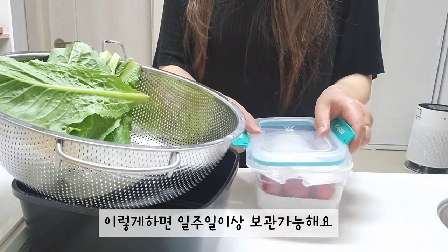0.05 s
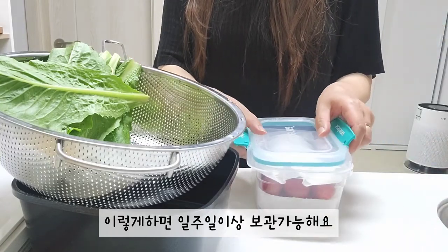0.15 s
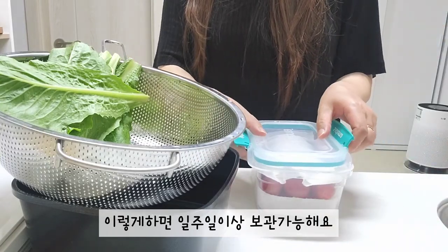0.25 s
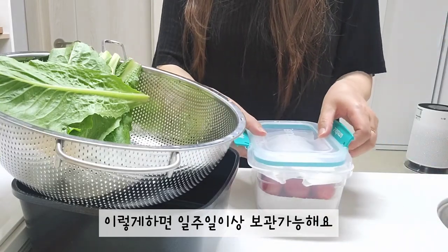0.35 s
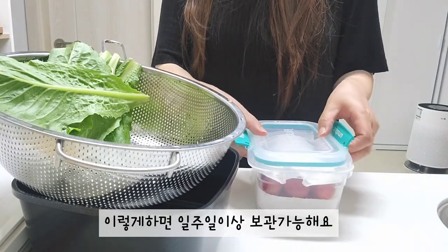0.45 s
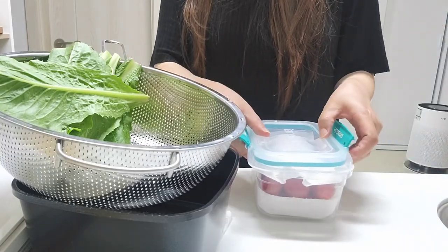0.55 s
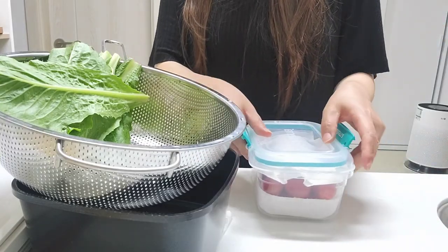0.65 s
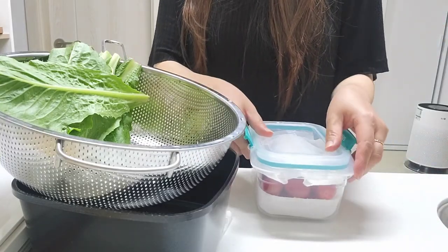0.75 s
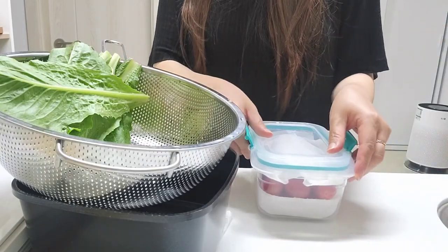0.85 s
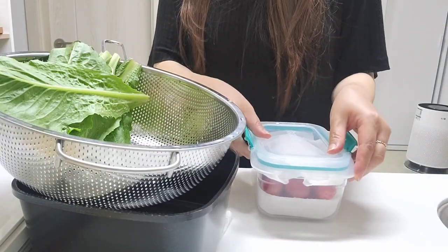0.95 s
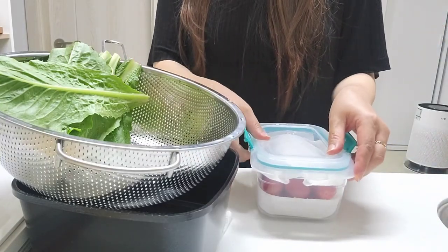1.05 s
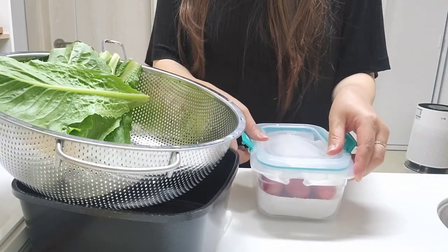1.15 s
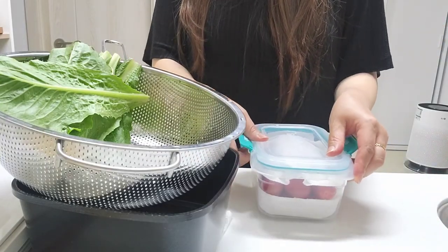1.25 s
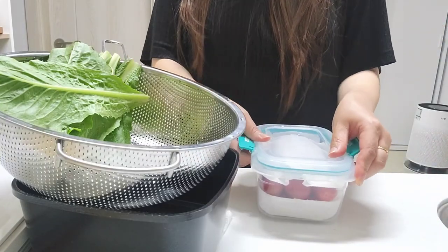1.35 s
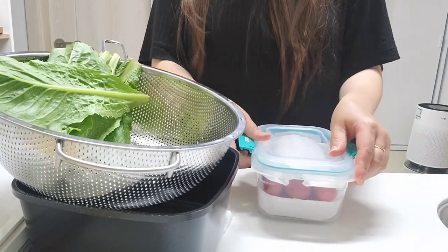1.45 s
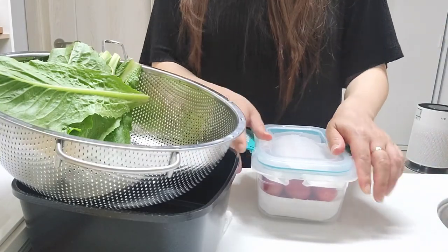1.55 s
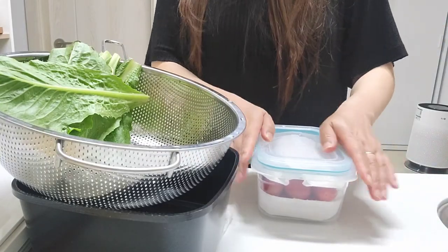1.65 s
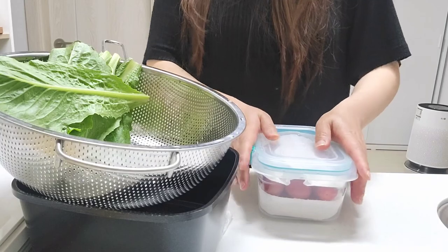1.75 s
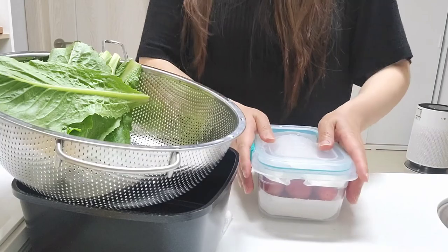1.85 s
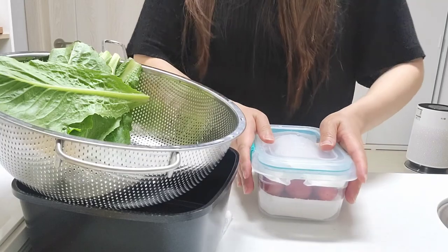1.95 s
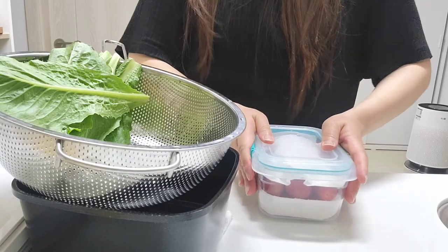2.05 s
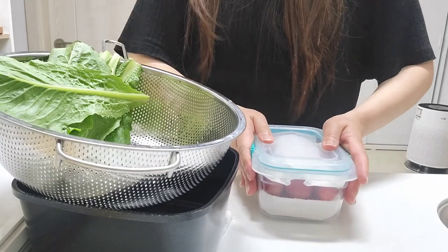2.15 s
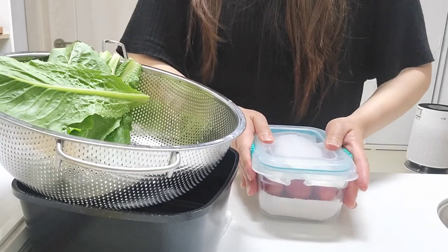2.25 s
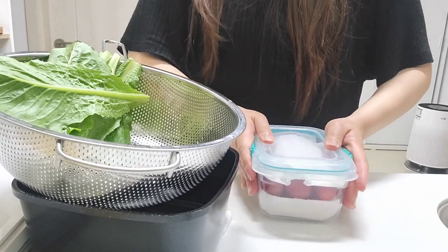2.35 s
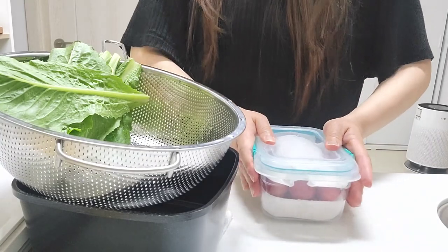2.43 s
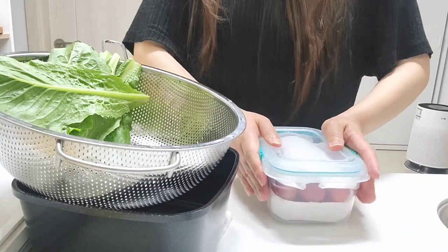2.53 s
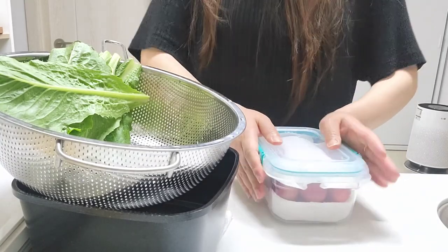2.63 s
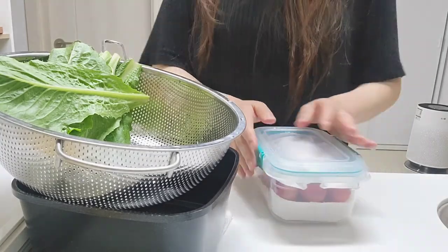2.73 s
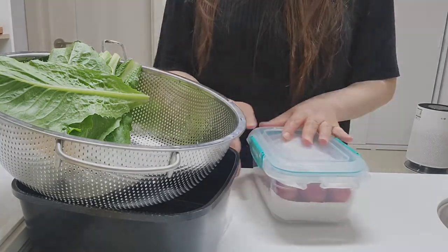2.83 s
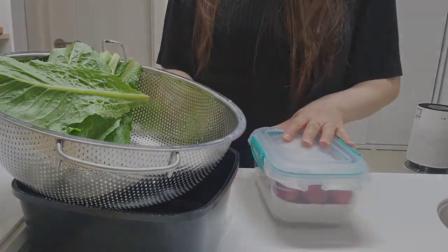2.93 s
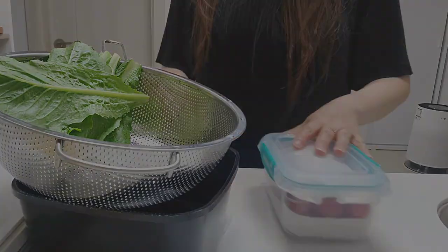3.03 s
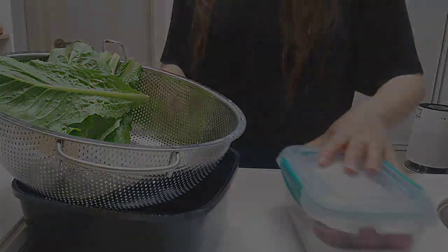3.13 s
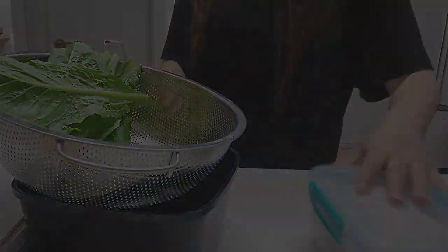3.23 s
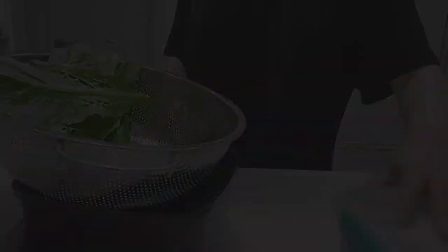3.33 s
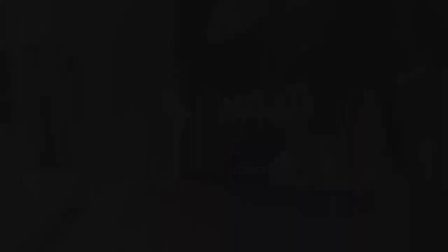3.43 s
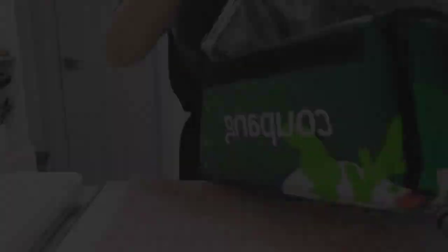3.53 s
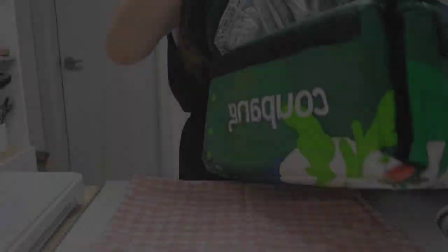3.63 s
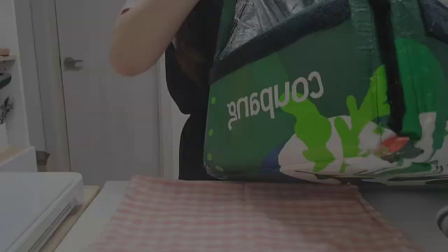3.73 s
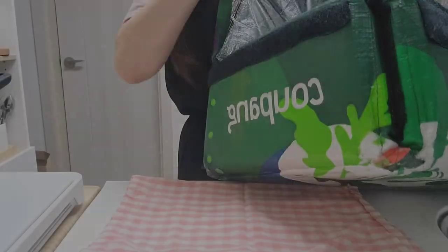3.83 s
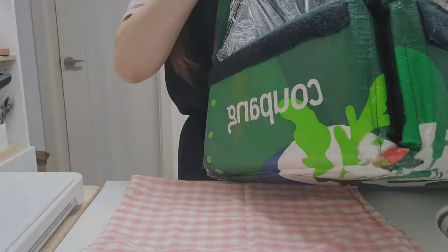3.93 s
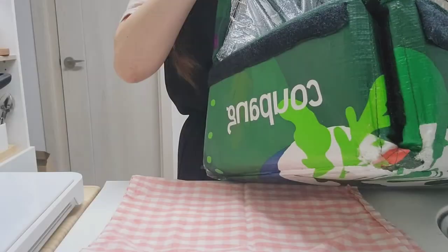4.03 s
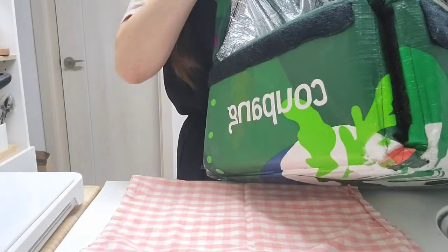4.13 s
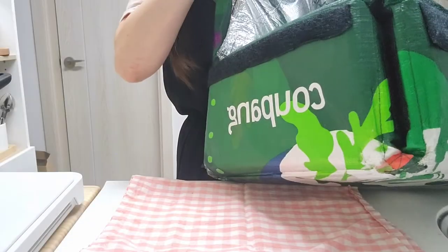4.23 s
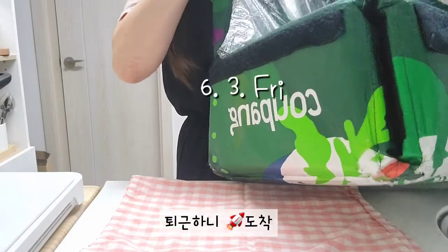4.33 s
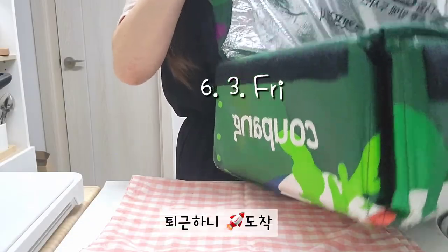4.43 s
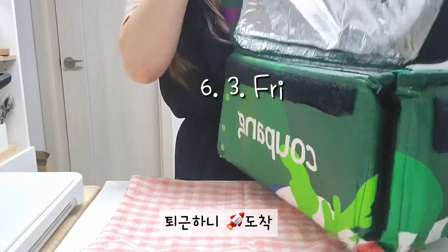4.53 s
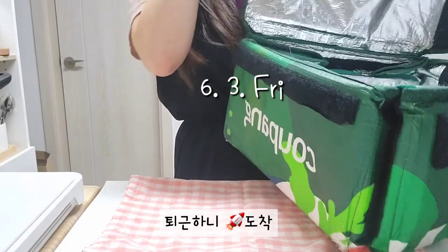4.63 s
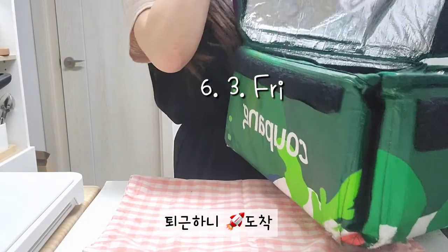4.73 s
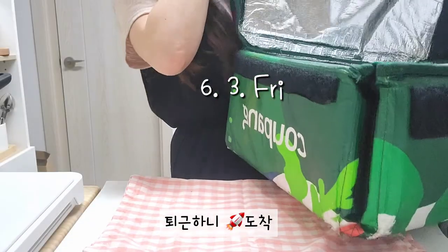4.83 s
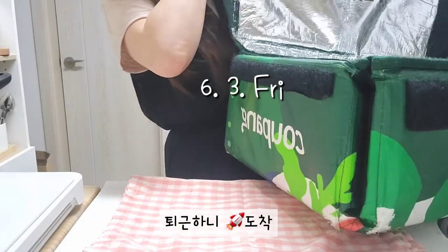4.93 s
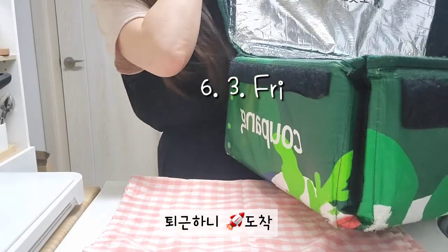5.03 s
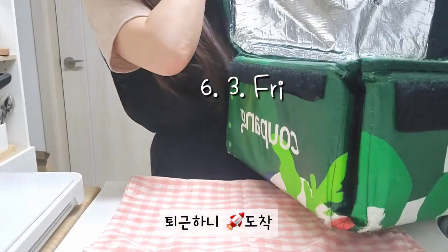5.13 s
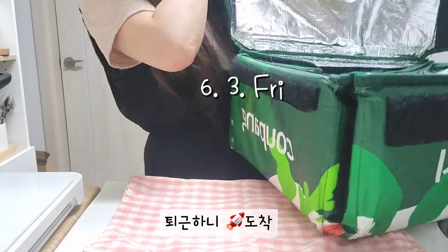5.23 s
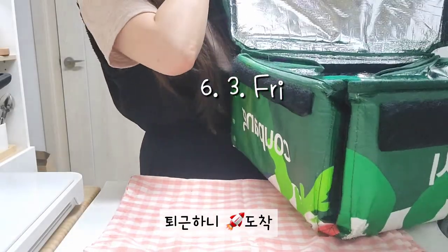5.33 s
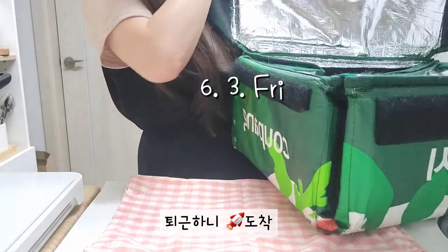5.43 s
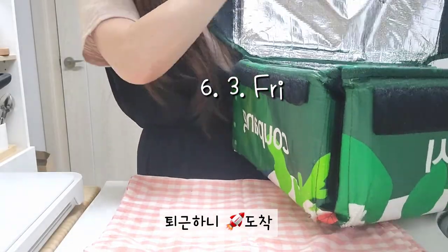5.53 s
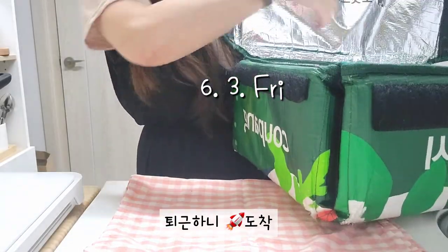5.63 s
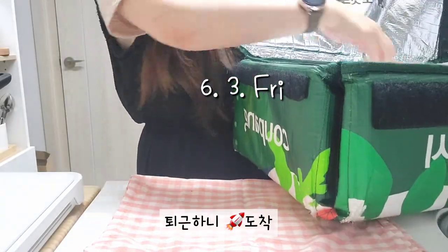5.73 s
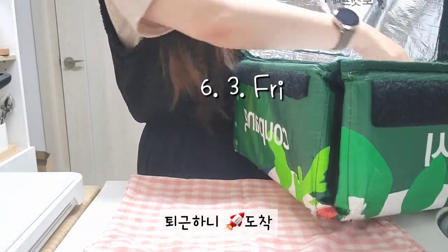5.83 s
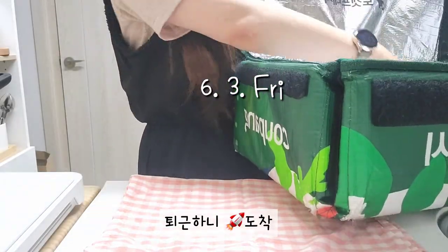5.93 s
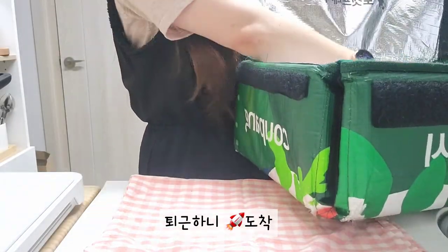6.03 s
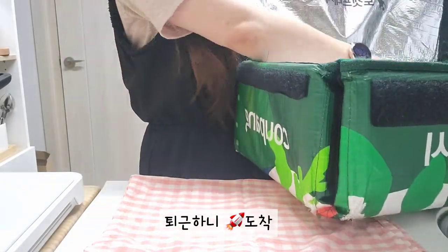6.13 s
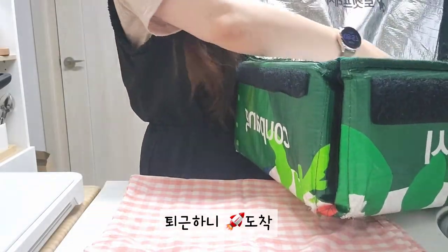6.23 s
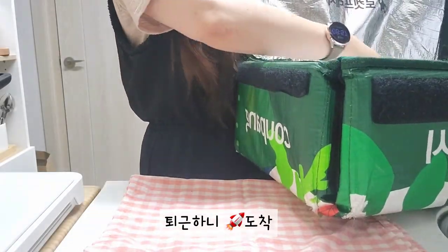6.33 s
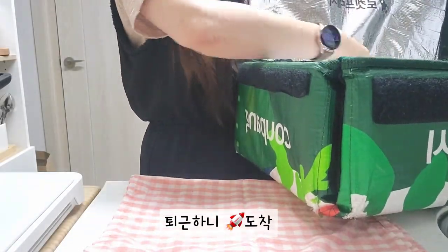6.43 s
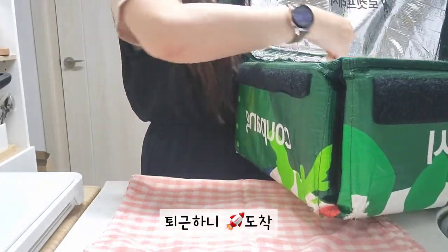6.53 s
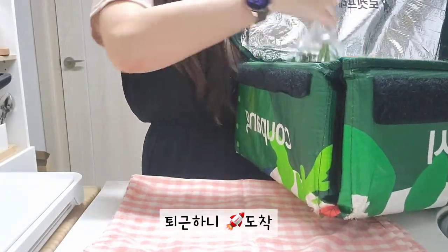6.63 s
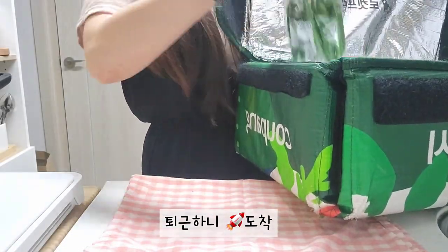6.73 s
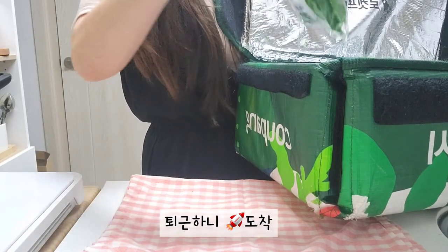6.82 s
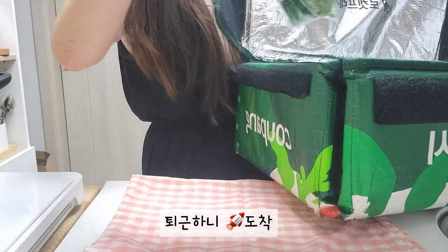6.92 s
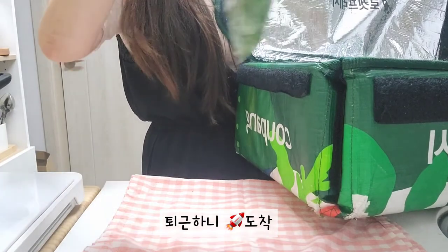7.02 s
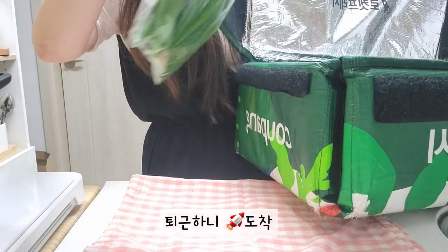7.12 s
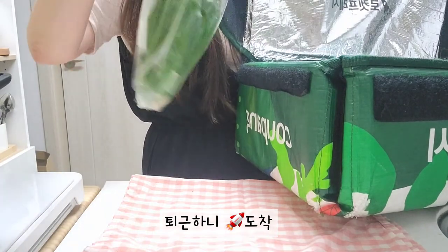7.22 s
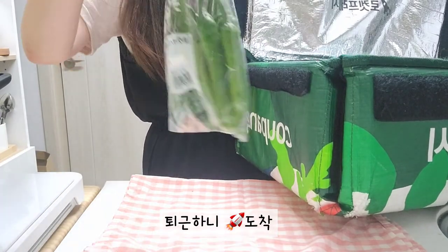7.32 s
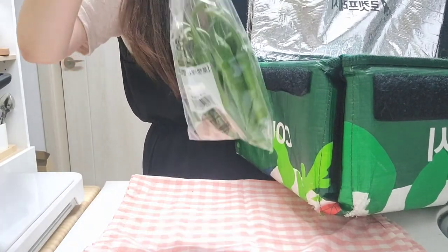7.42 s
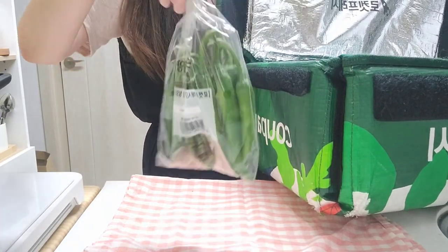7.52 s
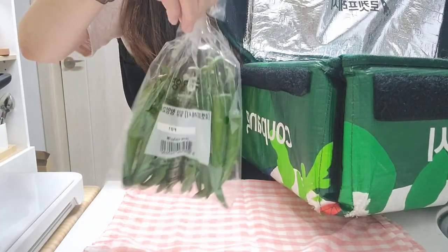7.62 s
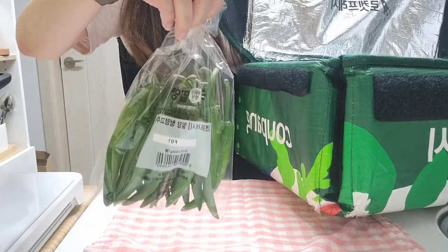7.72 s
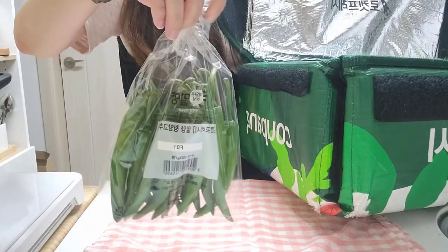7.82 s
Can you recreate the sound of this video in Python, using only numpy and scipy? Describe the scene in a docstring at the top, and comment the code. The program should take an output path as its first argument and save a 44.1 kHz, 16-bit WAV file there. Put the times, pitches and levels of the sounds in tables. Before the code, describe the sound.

Close clicks, light knocks and faint finger squeaks come from a plastic container, followed by loud latch snaps and a short slide over a counter. The quiet room tone then switches to a fan's low rush. A little farther off, a padded cooler bag rustles, pops at its folds and thumps down. A hand rummages inside and pulls out a crackling plastic bag of vegetables. The small kitchen adds a short echo.

```python
"""Fingers rub and squeak on a plastic food box on a kitchen counter; its latches crack shut, ringing
the hollow walls, and it slides away. Later, with a fan running, a foil-lined cooler bag is dragged
round and set down: cloth scrapes, folds pop, padding thumps. Last, a thin plastic bag of vegetables
crinkles as it is lifted out, its creases flipping in clumps. A small, hard room answers."""
import sys
import numpy as np
from scipy import signal
from scipy.io import wavfile
from scipy.ndimage import uniform_filter1d

SR = 44100
rng = np.random.default_rng(int(sys.argv[2]) if len(sys.argv) > 2 else 0)


def put_to_file(sound):
    """Save the sound as 16-bit audio at rate SR, in the file named by the first command-line argument."""
    columns = np.atleast_2d(sound).T  # one column per channel
    safe = np.clip(columns, -1, 1)
    whole_steps = np.round(safe * 32767)
    wavfile.write(sys.argv[1], SR, whole_steps.astype(np.int16))


N = 347067
TIME, FILTER_HZ = np.arange(N) / SR, np.fft.rfftfreq(4096, 1 / SR)
FAN_START_S = 3.538  # hard cut from the quiet room to the fan

# Cue levels are pre-fader: each source adds its own trims.
# EQ of the quiet room tone: f/Hz, level/dB
QUIET_EQ = [(20, -9.5), (60, 1.5), (115, 3), (170, -2.5), (300, -9), (470, -14), (680, -10.5), (950, -27.5),
            (1400, -24), (2500, -35), (6000, -42), (15000, -59)]
# fingers rub the lid, then shove the box away: t/s, length/s, rub level/dB, hiss level/dB
SLIDE_STROKES = [(0.0, 0.19, -77, -89), (0.234, 0.05, -66, -76), (1.34, 0.089, -72.5, -86),
                 (1.692, 0.088, -68, -75), (1.825, 0.39, -74, -89.5), (2.498, 0.16, -70.5, -77),
                 (2.654, 0.19, -81, -86.5), (3.005, 0.075, -69, -68), (3.033, 0.37, -64, -63),
                 (3.236, 0.25, -58, -53.5)]
# resonances that sliding wakes in the box: f/Hz, width/Hz, level/dB
SLIDE_RESONANCES = [(4330, 90, 0), (5400, 95, -1), (8500, 110, -2)]
# EQ of the sliding friction: f/Hz, level/dB
SLIDE_EQ = [(530, -28), (900, -3.5), (1250, 2), (1900, 2), (2500, -3), (3200, 0), (4050, -3.5),
            (5220, -1.5), (9000, -6), (16000, -11)]
# surfaces that stick and slip at a pitch, plus one short, broad crunch of the cooler bag at 4.68 s: t/s,
# length/s, f/Hz, width/Hz, level/dB
SQUEAK_CUES = [(0.0, 0.37, 1360, 1090, -65.5), (0.082, 0.12, 4230, 450, -79), (1.879, 0.33, 3500, 990, -66),
               (1.93, 0.19, 5000, 900, -77), (1.91, 0.25, 6030, 200, -82), (2.52, 0.16, 3870, 318, -73),
               (2.515, 0.07, 5980, 260, -74), (2.681, 0.16, 3590, 401, -76), (3.0, 0.12, 3870, 500, -63),
               (3.03, 0.21, 3170, 400, -70), (3.4, 0.12, 5240, 240, -54.5), (4.678, 0.036, 2565, 2590, -32),
               (6.643, 0.094, 3040, 605, -49.5)]
# latch snaps and knocks: t/s, clack level/dB, thud level/dB, tick level/dB, struck spot's f/Hz
BOX_KNOCKS = [(0.0726, -38, -46.5, -70, 1450), (0.223, -54.5, -64, -77, 5500), (0.281, -33, -39, -51, 624),
              (0.2847, -31, -35.5, -47, 1180), (0.318, -66, -43.5, -78, 205), (0.583, -63.5, -66, -97, 690),
              (0.783, -50, -53.5, -82, 995), (0.836, -44, -49, -75.5, 1130), (0.849, -57, -50, -88, 540),
              (1.133, -55, -51, -79, 190), (1.31, -65, -57, -89, 217), (1.648, -47, -53.5, -74, 182),
              (1.723, -50, -62, -72, 250), (1.779, -45, -56, -64, 1390), (1.842, -54.5, -76, -68, 3950),
              (1.858, -47.5, -58, -74, 1390), (2.159, -21, -25.5, -46, 350), (2.199, -17, -43.5, -31, 1560),
              (2.304, -22, -31.5, -48, 640), (2.3108, -16.5, -32.5, -27, 2190),
              (2.914, -68, -50, -79, 201.6), (3.105, -48.5, -47, -86, 215),
              (3.329, -39.5, -47, -49.5, 1310)]
# EQ of a blow on the box: f/Hz, level/dB
BOX_EQ = [(41, -48.5), (85, 4.5), (160, -2), (305, 7.5), (440, 0), (700, 8.5), (1000, 0), (1150, 0.5),
          (1600, 4), (2120, -9), (2980, -9.5), (3490, -17), (5140, -22), (11600, -37.5), (16000, -42)]
# modes of box and lid: f/Hz, level/dB, t60/s
SHELL_MODES = [(231.3, 0, 0.23), (298.6, -1, 0.11), (493, -0.5, 0.11), (656, 5, 0.19), (790, 3.5, 0.1),
               (980, -2.5, 0.06), (1181, 9, 0.12), (1365, 5, 0.067), (1620, 2.5, 0.1), (1865, 2, 0.09),
               (2530, 0.5, 0.073), (2910, 2, 0.11), (3800, -5.5, 0.06)]
# pushes and pulls on the cooler bag: t/s, length/s, padding level/dB, cloth level/dB, foil level/dB
COOLER_STROKES = [(3.523, 0.16, -44.5, -43, -53), (3.676, 0.053, -48, -68, -55.5),
                  (3.781, 0.08, -49, -53.5, -58.5), (3.852, 0.62, -55.5, -63, -75.5),
                  (4.223, 0.17, -42.5, -40, -47), (4.388, 0.21, -33.5, -36.5, -42.5),
                  (4.617, 0.081, -41, -39.5, -52), (4.68, 0.49, -54.5, -57, -70),
                  (4.78, 0.063, -63, -49, -60), (5.142, 0.3, -58.5, -58.5, -65.5),
                  (5.446, 0.18, -57, -55.5, -61.5), (5.63, 0.42, -61.5, -62.5, -74)]
# EQ of the padded cloth: f/Hz, level/dB
COOLER_EQ = [(21, -59), (35, 14), (60, 1.5), (112, 9.5), (165, 4), (240, 6.5), (340, 1), (500, -5.5),
             (884, -11), (1250, -8.5), (2000, -11.5), (3000, -15.5), (4010, -21), (4800, -26.5),
             (9000, -35.5), (15500, -39)]
# EQ of the fan's rush: f/Hz, level/dB
FAN_EQ = [(20, -8), (50, -7), (100, 0), (170, -14), (300, 1), (450, -8.5), (720, 1), (950, -14),
          (1250, -10.5), (1900, -14), (3500, -23), (8000, -45), (15000, -37)]
# hum of the fan motor: f/Hz, rms level/dB
MOTOR_HUM = [(119, -63.5), (238, -67), (840, -66.5)]
# cooler folds that buckle: t/s, pop level/dB, thud level/dB, tick level/dB, fold's f/Hz
COOLER_FOLDS = [(3.539, -35.5, -44, -65, 687), (3.62, -37, -61, -51, 1160), (3.661, -28, -64, -54, 1480),
                (3.736, -35.5, -44, -76, 1280), (3.768, -64, -62, -50, 4800), (3.823, -36, -65, -52, 3200),
                (3.932, -39.5, -55, -73, 1480), (4.067, -39, -41.5, -61, 850), (4.118, -37, -57, -60, 845),
                (4.145, -35, -50, -44.5, 1240), (4.24, -33, -54, -65, 1780), (4.685, -28.5, -66, -49, 2270),
                (4.9468, -35.5, -64, -85, 1350), (5.042, -34.5, -62, -67, 1570),
                (5.461, -43, -72, -51.5, 1240), (7.575, -38.5, -58, -64, 680)]
# the cooler bumps on the counter or under the reaching hand: t/s, level/dB, f/Hz
COOLER_BUMPS = [(4.062, -38, 75), (4.455, -28.5, 186), (4.572, -28, 303), (4.616, -23, 117),
                (6.656, -45, 228), (6.705, -42, 215)]
# the hand rummages, grips and lifts the thin plastic: t/s, length/s, rustle level/dB, fizz level/dB
PLASTIC_STROKES = [(6.104, 0.55, -52.5, -63), (6.169, 0.15, -50.5, -57), (6.344, 0.059, -47, -56),
                   (6.453, 0.046, -50.5, -57), (6.546, 0.16, -51.5, -56.5), (6.642, 0.035, -44, -54),
                   (6.69, 0.025, -40, -46), (6.737, 0.07, -53.5, -56), (6.842, 0.16, -48, -54),
                   (7.041, 0.046, -40, -45), (7.144, 0.065, -44, -48), (7.222, 0.2, -51.5, -50),
                   (7.442, 0.17, -52.5, -55.5), (7.68, 0.066, -55, -58)]
# EQ of the thin plastic: f/Hz, level/dB
PLASTIC_EQ = [(40, -29), (110, 5.5), (220, 2), (380, -10), (580, -2), (900, -3), (1400, -1), (1780, 3),
              (2400, -2.5), (3150, 1.5), (4000, -1.5), (9000, -5), (15500, -9)]
# sharp creases of the thin plastic: t/s, peak level/dB
PLASTIC_CREASES = [(6.117, -39.5), (6.201, -43), (6.249, -47), (6.2652, -33), (6.3557, -44), (6.655, -37),
                   (6.708, -27.5), (6.8708, -31.5), (6.909, -34.5), (6.991, -32.5), (7.078, -24),
                   (7.087, -30), (7.1637, -28), (7.182, -25.5), (7.278, -33), (7.343, -25), (7.414, -31.5),
                   (7.468, -31), (7.603, -32.5), (7.6694, -29.5), (7.714, -31.5), (7.7742, -28)]
# stereo width: f/Hz, side level/dB relative to mid
SIDE_EQ = [(60, -17), (200, -15), (450, -9), (900, -3), (2000, -1), (4000, 0), (16000, 0)]
# reverb time of the kitchen: f/Hz, t60/s
KITCHEN_T60 = [(100, 0.24), (300, 0.41), (700, 0.34), (1800, 0.26), (5000, 0.22), (14000, 0.26)]


def amp(db):
    """Decibels to gain."""
    return 10 ** (np.asarray(db) / 20)


def mid_rms(x):
    """Level of what both channels share."""
    return np.sqrt(np.mean(x.mean(0) ** 2) + 1e-20)


def curve_at(points, hz):
    """Breakpoints joined by straight lines over log frequency."""
    f, value = np.transpose(points)
    return np.interp(np.log(hz + 1), np.log(f + 1), value)


def add(mix, start_s, sound):
    """Lays a sound into the stereo mix."""
    part = mix[:, round(start_s * SR):][:, :sound.shape[1]]
    part += sound[:, :part.shape[1]]


def eq(x, points):
    """Minimum-phase EQ, so that attacks stay sharp."""
    log_gain = np.log(amp(np.maximum(curve_at(points, FILTER_HZ), -100)))
    mirrored = np.concatenate([log_gain, log_gain[-2:0:-1]])
    taps = np.fft.ifft(np.exp(np.conj(signal.hilbert(mirrored)))).real
    return signal.oaconvolve(x, taps[None], axes=1)[:, :x.shape[1]]


def boost(x, hz, lift_db, reach=1.83):
    """A broad EQ peak around hz."""
    return eq(x, [(hz / reach, 0), (hz, lift_db), (hz * reach, 0)])


def resonate(x, hz, width_hz):
    """A resonance that follows the curve hz."""
    carrier = np.exp(2j * np.pi * np.cumsum(hz) / SR)
    pole = np.exp(-np.pi * width_hz / SR)
    return 2 * (carrier * signal.lfilter([1 - pole], [1, -pole], x / carrier)).real


def stereo(pair):
    """Two unrelated signals become mid and side: narrow bass, wide treble."""
    side = eq(pair[1:], SIDE_EQ)[0]
    return np.array([pair[0] + side, pair[0] - side])


def split(x, edges_hz):
    """Crossovers cut a sound into bands, low to high."""
    bands = []
    for edge in edges_hz:
        low, high = (np.tile(signal.butter(2, edge, kind, fs=SR, output="sos"), (2, 1))
                     for kind in ("low", "high"))
        bands.append(signal.sosfilt(low, x))
        x = signal.sosfilt(high, x)
    return bands + [x]


def drift(per_s):
    """A random control curve of about unit size."""
    knots = rng.standard_normal(int(per_s * N / SR) + 2)
    return np.interp(TIME * per_s, np.arange(len(knots)), knots)


def burst(fall_s, size=4096):
    """A dying spray of stereo noise."""
    return stereo(rng.standard_normal((2, size)) * np.exp(-np.arange(size) / SR / fall_s))


def crackle(per_s, spread_db, clump_db, fall_s, patchy_db):
    """Tiny slips and crease flips come in clumps, coloured by brief, ever-changing spectral peaks."""
    onsets = np.flatnonzero(rng.random(N) < per_s / SR)
    age = np.arange(int(4 * fall_s * SR))
    strength = amp(spread_db * np.minimum(rng.exponential(1, (len(onsets), 1)), 3.5))
    flips = strength * np.exp(-age / SR / fall_s) * rng.standard_normal((2, len(onsets), len(age)))
    positions = (onsets[:, None] + age).ravel()
    grains = stereo(np.array([np.bincount(positions, flip.ravel(), N)[:N] for flip in flips]))
    spectrum = signal.stft(grains * amp(clump_db * drift(90)), nperseg=256)[2]
    patches = uniform_filter1d(rng.standard_normal(spectrum.shape[1:]), size=2, axis=0)
    patches = uniform_filter1d(patches, size=10, axis=1)
    return signal.istft(spectrum * amp(patchy_db * patches / patches.std()), nperseg=256)[1][:, :N]


def perform(texture, strokes, edges_hz, attack_s, release_s, sag_db_per_s):
    """Hand strokes ride each band of a steady texture: they swell, ease off and die away."""
    out, control_t = np.zeros((2, N)), TIME[::16]
    start, length, *levels = np.transpose(strokes)
    t, length = control_t - start[:, None], length[:, None]
    attack = np.clip(t / attack_s, 0, 1)
    sag = amp(-sag_db_per_s * (np.clip(t, 0, length) - length / 2))
    release = np.exp(-np.maximum(t - length, 0) / release_s)
    for band, db in zip(split(texture, edges_hz), levels):
        power = uniform_filter1d(band.mean(0) ** 2, size=3000)
        gain = np.linalg.norm(amp(db)[:, None] * attack * sag * release, axis=0)
        out += band / np.sqrt(abs(power) + 1e-12) * np.interp(TIME, control_t, gain)
    return out


def balance(sound, levels_db, size=900):
    """Centres a hit and sets its lows, mids and highs by their rms over the first size samples."""
    bands = [band / band[:, :size].std(1, keepdims=True) for band in split(sound, [500, 3500])]
    return sum(amp(db) * band / mid_rms(band[:, :size]) for band, db in zip(bands, levels_db))


def quiet_room(air_db=-60, drone_db=-50.5, drone_hz=47.2):
    """Dark room tone over a low drone that wavers in pitch and level."""
    air = eq(stereo(rng.standard_normal((2, N))), QUIET_EQ)
    drone = np.sin(2 * np.pi * np.cumsum(drone_hz + 4.5 * drift(25)) / SR)
    return amp(air_db) * air / mid_rms(air) + drone * amp(drone_db + 4 * drift(10))


def box_slide(trim_db=-1):
    """Plastic rubs on skin and counter; resonances come and go as the contact shifts."""
    grain = crackle(per_s=9000, spread_db=2, clump_db=1.3, fall_s=0.00021, patchy_db=2.6)
    rings = sum(amp(db + 4 * drift(14)) * resonate(grain, hz * (1 + .008 * drift(10)), width)
                for hz, width, db in SLIDE_RESONANCES)
    return amp(trim_db) * perform(eq(grain + rings, SLIDE_EQ), SLIDE_STROKES, [5000],
                                  attack_s=0.037, release_s=0.033, sag_db_per_s=5.5)


def squeaks(trim_db=-1, count=9):
    """Stick and slip: a cluster of thin, trembling tones swells and fades with the stroke; spread wide, the
    cluster makes a brief crunch."""
    out = np.zeros((2, N))
    for start, length, hz, width, db in SQUEAK_CUES:
        size = int(length * SR)
        pitches = hz + width * (np.linspace(-.5, .5, count) + rng.uniform(-.1, .1, count))
        tremble = uniform_filter1d(rng.standard_normal((2, count, size)), size=100)
        cycles = np.cumsum(pitches[:, None] + tremble * 10 * np.sqrt(20 * width), -1) / SR
        tones = np.sin(2 * np.pi * (cycles + rng.random((2, count, 1))))
        squeak = stereo((tones * np.hanning(count + 2)[1:-1, None]).sum(1))
        squeak *= amp(2.5 * drift(70)[:size])  # the grip catches unevenly
        add(out, start, amp(db + trim_db) * squeak / mid_rms(squeak) * signal.windows.tukey(size, .8))
    return out


def box_ring(t):
    """Box and lid ring in their modes; each grip detunes and reweights them."""
    grip = rng.standard_normal((len(SHELL_MODES), 2)) * [.025, 3]
    ring = np.zeros((2, len(t)))
    for (hz, db, t60), (detune, lift_db) in zip(SHELL_MODES, grip):
        cycles = hz * (1 + detune) * t + rng.random((2, 1))
        ring += amp(db + lift_db - 60 * t / t60) * np.sin(2 * np.pi * cycles)
    return stereo(ring)


def box_knocks(ring_db=-9, wall_db=-10, lead_in_db=-33):
    """A latch jumps its lip with a crack; lighter knocks are blunt and chatter. Both ring the box."""
    out, t, lead = np.zeros((2, N)), np.arange(4096) / SR, 400
    for start, clack_db, thud_db, tick_db, hz in BOX_KNOCKS:
        force = np.interp(clack_db, [-42, -20], [0, 1])
        chatter = burst(fall_s=np.interp(force, [0, 1], [.007, .0026]))
        push = amp(-4 - 12 * force) * chatter * (1 - np.exp(-t / 0.0007))
        push[:, 0] += 1  # the crack itself
        lead_in = amp(lead_in_db) * burst(0.0069, size=lead)[:, ::-1]  # a faint, brief swell of noise
        blow = eq(np.hstack([lead_in, push]), BOX_EQ)
        ring = box_ring(t)
        wall = np.sin(2 * np.pi * hz * t) * amp(-4 * hz * t)  # the struck wall loses 4 dB a cycle
        flex_db = wall_db - 4 * np.log2(hz / 600)  # broad, low-pitched walls give more
        body = amp(ring_db) * ring / ring.std() + amp(flex_db) * wall / wall.std()
        knock = boost(blow / mid_rms(blow) + np.pad(body, ((0, 0), (lead, 0))), hz, lift_db=4)
        add(out, start - lead / SR, balance(knock, [thud_db - 1, clack_db - 10, tick_db - 1], 1300))
    return out


def cooler_rustle(trim_db=-1):
    """Coarse cloth scrapes, the padding rumbles and the foil lining fizzes."""
    grain = crackle(per_s=3000, spread_db=3.5, clump_db=1.5, fall_s=.001, patchy_db=2.7)
    return amp(trim_db) * perform(eq(grain, COOLER_EQ), COOLER_STROKES, [450, 4000],
                                  attack_s=0.031, release_s=0.012, sag_db_per_s=0.5)


def fan(rush_db=-53.5):
    """A steady rush of air over the motor's slightly wavering hum."""
    rush = eq(stereo(rng.standard_normal((2, N))), FAN_EQ)
    hum = sum(amp(db) * np.sqrt(2) * np.sin(2 * np.pi * np.cumsum(hz + 2 * drift(14)) / SR)
              for hz, db in MOTOR_HUM)
    return amp(rush_db) * rush / mid_rms(rush) + hum


def cooler_pops():
    """Stiff padded cloth buckles with dull pops, each fold at its own pitch."""
    out = np.zeros((2, N))
    for start, pop_db, thud_db, tick_db, hz in COOLER_FOLDS:
        pop = boost(eq(burst(fall_s=0.0059), COOLER_EQ), hz, lift_db=7)
        add(out, start, balance(pop, [thud_db - 3, pop_db - 10, tick_db - 3]))
    return out


def cooler_bumps(rise_s=0.0045, decay_cycles=1.57):
    """The padded bag is bumped: a soft low thump that dies in a few cycles."""
    out, t = np.zeros((2, N)), np.arange(8192) / SR
    for start, db, hz in COOLER_BUMPS:
        swell = (1 - np.exp(-t / rise_s)) * np.exp(-hz * t / decay_cycles)
        thump = swell / swell.max() * np.sin(2 * np.pi * hz * t)
        add(out, start, amp(db) * thump[None])
    return out


def plastic_rustle(trim_db=-1, cavity_db=-9):
    """Thin plastic rubs densely inside the hollow cooler, then crackles more sparsely in the open."""
    dense = crackle(per_s=2000, spread_db=3.8, clump_db=2, fall_s=.0007, patchy_db=3)
    sparse = crackle(per_s=1500, spread_db=3.8, clump_db=2.2, fall_s=.0006, patchy_db=2.8)
    lifted = np.interp(TIME, [6.6, 7.3], [0, 1])
    grain = np.sqrt(1 - lifted) * dense / mid_rms(dense) + np.sqrt(lifted) * sparse / mid_rms(sparse)
    rustle = amp(trim_db) * perform(eq(grain, PLASTIC_EQ), PLASTIC_STROKES, [5000],
                                    attack_s=0.017, release_s=0.017, sag_db_per_s=7.5)
    cavity = eq(rustle, [(35, -20), (110, -2), (220, 14), (480, 17.5), (1100, -5)])
    return rustle + amp(cavity_db) * (1 - lifted) * cavity


def plastic_snaps(bright_db=5):
    """Single large creases flip with a bright crack."""
    out = np.zeros((2, N))
    for start, db in PLASTIC_CREASES:
        crack = eq(eq(burst(fall_s=0.0028), PLASTIC_EQ), [(1500, 0), (8000, bright_db)])
        add(out, start, amp(db) * crack / abs(crack.mean(0)).max())
    return out


def kitchen(x, tail_db, early_db, early_fall_s):
    """Quick echoes off the counter and nearby things, then a short tail, longest in the low mids."""
    taps = rng.choice([-1., 1.], (2, SR // 2)) * (rng.random((2, SR // 2)) < 4000 / SR)
    taps[:, :SR // 200] = 0  # 5 ms pre-delay
    hz, t, spectrum = signal.stft(taps, SR, nperseg=256)
    decay = amp(-60 * t / curve_at(KITCHEN_T60, hz)[:, None])
    tail = signal.istft(spectrum * decay, SR, nperseg=256)[1]
    echo = stereo(amp(tail_db) * tail / np.linalg.norm(tail[0]))
    early = burst(early_fall_s)
    add(echo, .001, amp(early_db) * early / np.linalg.norm(early.mean(0)))
    return x + signal.oaconvolve(x, echo, axes=1)[:, :N]


def scene():
    """The box close by, the bags a little farther off, all in one kitchen."""
    box = kitchen(box_knocks() + box_slide(), tail_db=-11, early_db=-6.5, early_fall_s=0.0043)
    bags = cooler_pops() + cooler_bumps() + cooler_rustle() + plastic_rustle() + plastic_snaps()
    foley = box + kitchen(bags, tail_db=-7, early_db=-7.5, early_fall_s=0.01) + squeaks()
    bed = np.where(TIME < FAN_START_S, quiet_room(), fan())
    left_db = np.interp(TIME, [4.5, 7.6], [-.55, .35])  # the mix pans from just right to just left
    return (foley + bed) * amp([left_db, -left_db])


def record(dry, cutoff_hz=16050):
    """A steep low-pass on the master."""
    lowpass = signal.firwin(511, cutoff_hz, window=("kaiser", 9), fs=SR)
    return signal.oaconvolve(dry, lowpass[None], "same")


dry = scene()
out = record(dry)
put_to_file(out)
```